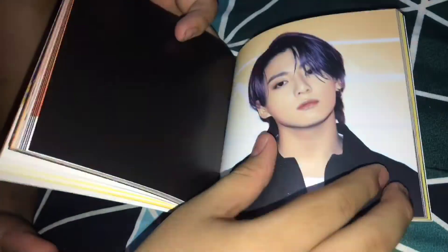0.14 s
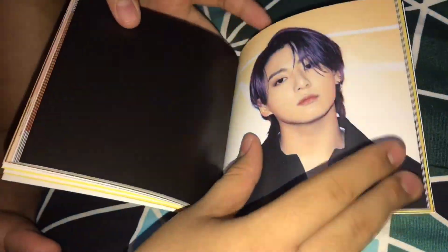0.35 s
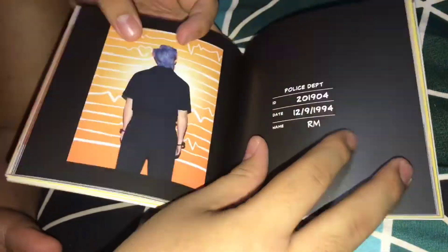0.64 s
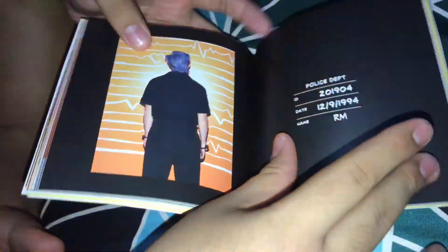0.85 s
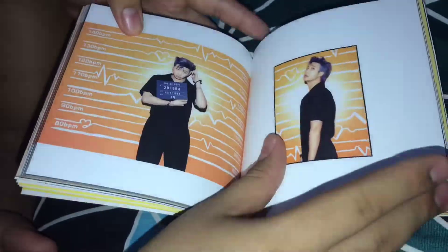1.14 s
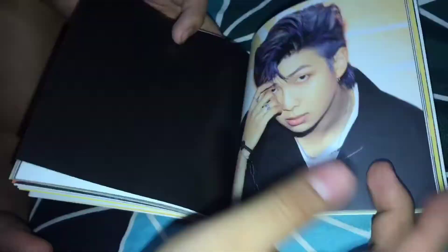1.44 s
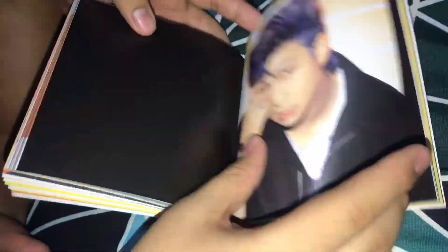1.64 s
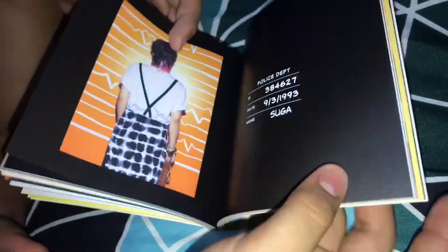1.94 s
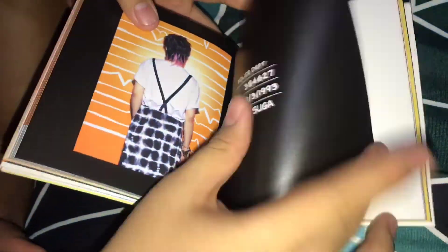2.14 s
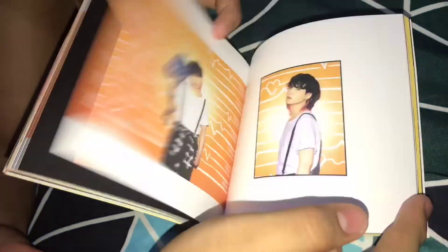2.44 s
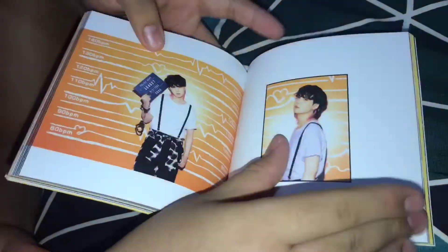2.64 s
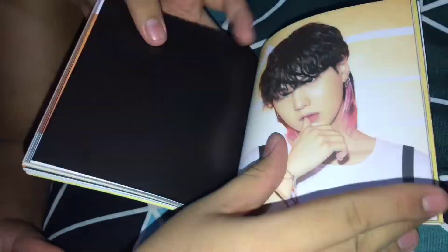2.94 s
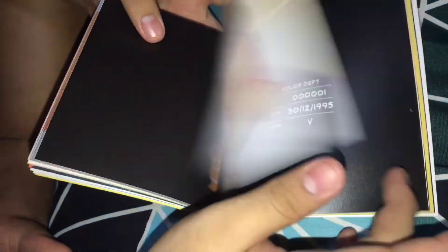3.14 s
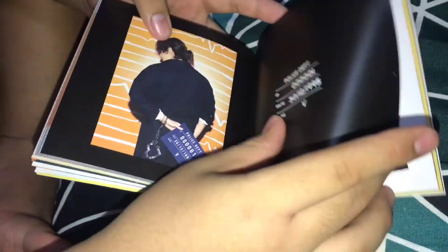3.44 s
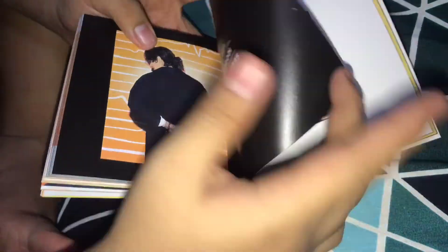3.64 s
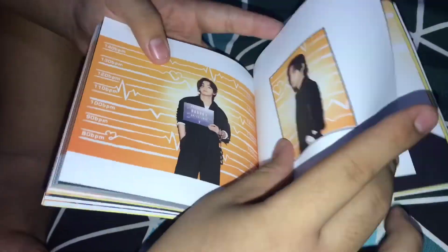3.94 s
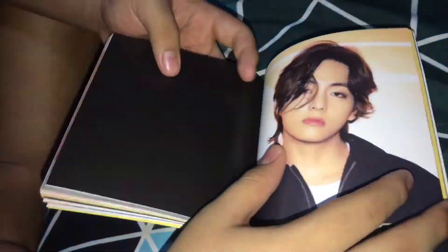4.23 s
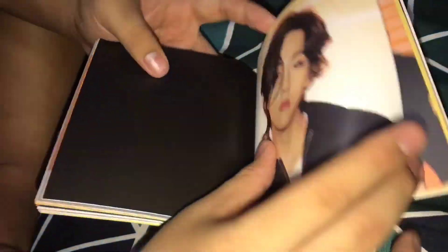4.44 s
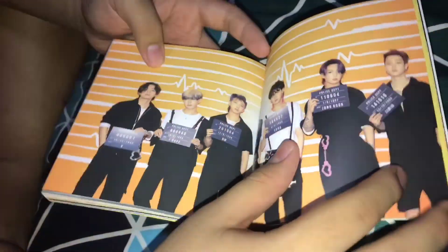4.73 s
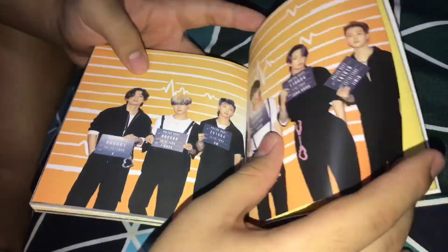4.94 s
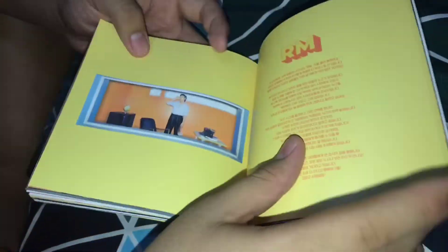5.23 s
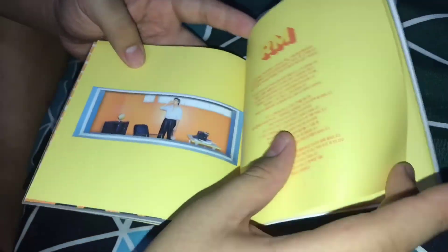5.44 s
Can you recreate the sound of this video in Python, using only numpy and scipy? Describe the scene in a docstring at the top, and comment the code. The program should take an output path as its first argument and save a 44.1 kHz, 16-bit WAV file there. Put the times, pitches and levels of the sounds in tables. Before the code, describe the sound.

Close to a phone in a small quiet room, a hand turns stiff glossy pages about twice a second. Each turn starts with a quick peeling scrape, followed by short swishes and a faint rustle as the sheet settles. Tiny dry snaps and soft pats on the stack come in between, while a fan hums low and hisses faintly throughout.

```python
"""A hand leafs through a book of stiff glossy pages, close to a phone in a quiet room, about two pages a second.
In each turn a finger peels a sheet off the stack, and it slides in short swishes and rustles as it settles.
These rubs are tiny random slips that ring the paper; now and then a fingertip drags on the gloss.
Edges snapping free and pats on the stack are short damped swings, each with a tiny crack of noise.
Behind the pages a fan or air conditioner, made of shaped noise, hums low and hisses faintly."""
import sys
import numpy as np
from scipy import signal
from scipy.fft import rfft, irfft
from scipy.io import wavfile
from scipy.ndimage import uniform_filter1d

SR = 44100
rng = np.random.default_rng(int(sys.argv[2]) if len(sys.argv) > 2 else 0)


def put_to_file(sound):
    """Save the sound as 16-bit audio at rate SR, in the file named by the first command-line argument."""
    columns = np.atleast_2d(sound).T  # one column per channel
    safe = np.clip(columns, -1, 1)
    whole_steps = np.round(safe * 32767)
    wavfile.write(sys.argv[1], SR, whole_steps.astype(np.int16))


N = 245637
TIME = np.arange(N) / SR
FREQS = np.maximum(np.arange(N // 2 + 1) * SR / N, 1)  # kept above zero so that its log exists

# What rubbed paper rings with: four body tones of the stiff page block, then the hiss of the edge.
# Columns: pitch_hz, width_hz
PAPER_TONES = [(1280, 420), (2060, 484), (2800, 525), (3600, 755), (5750, 2000)]
# A finger peels a sheet off the stack and starts a turn; a rustle follows.
# Columns: height_s (moment of full speed), rise_s, fall_s, level_db, edge_hiss_db (above level), rustle_level_db
PEELS = [(0.389, .008, 0.016, -46.5, -4, -61), (0.877, 0.019, 0.033, -47.5, -4, -63),
         (1.289, .011, 0.02, -47.5, -0.5, -65), (1.611, 0.0064, 0.0074, -44, -8.5, -61.5),
         (2.115, 0.011, 0.015, -50, -1, -67), (2.686, .009, .012, -47, 0.5, -64),
         (3.073, 0.0079, .011, -46, -2.5, -72), (3.401, .005, 0.019, -47.5, -1, -72.5),
         (3.955, .01, 0.027, -48, -4, -66), (4.331, .0064, 0.019, -51.5, -4, -61),
         (4.879, 0.012, 0.016, -51, -7, -65), (5.374, 0.012, 0.0071, -49.5, -3, -62.5),
         (5.448, 0.011, 0.038, -53.5, -4, -73)]
# How hard a peel drives each body tone. Column: drive_db (added to its level)
PEEL_DRIVE = [-9, -1, -1, -2.5]
# The sheet slides over its neighbour, brighter the more it is bent.
# Columns: height_s, length_s, level_db, tilt_db_per_octave, edge_hiss_db (above level)
SLIDES = [(0.028, 0.035, -60, 8, -1), (0.052, 0.025, -49.5, 7, -11), (0.109, 0.027, -55.5, 9.5, -0.5),
          (0.432, .016, -50.5, 2, -5.5), (0.473, 0.023, -57.5, 0, -1), (0.517, 0.034, -55, 2, -7),
          (0.626, 0.012, -62.5, -2.5, 13.5), (0.966, 0.021, -46, -0.5, -6), (1.001, 0.019, -51, 9.5, -4),
          (1.415, 0.028, -52.5, 3, 1), (1.471, 0.018, -55.5, 12, -3), (1.647, 0.023, -55, 3, -6),
          (1.73, 0.022, -53.5, 4, -1), (1.84, 0.023, -51, 10, -2.5), (1.938, 0.017, -53.5, 13, -3),
          (2.147, 0.021, -49, 1, -1), (2.252, 0.014, -49, 5, 0), (2.43, 0.049, -58, 4, -1),
          (2.489, 0.03, -57.5, 12, -4), (2.724, 0.063, -52.5, 1.5, -3.5), (2.823, 0.028, -52.5, -1.5, -5),
          (2.864, 0.022, -49.5, 19, -8), (3.107, 0.033, -54.5, 1, -5.5), (3.169, 0.024, -48, -1, -18),
          (3.21, 0.019, -53.5, 6, -13), (3.624, 0.026, -48.5, -0.5, -9), (3.675, 0.011, -47, 8, -8),
          (3.693, 0.016, -47, -3, -11), (3.719, 0.038, -59.5, 11, 4), (3.916, 0.024, -53, 4, 1),
          (4.035, 0.023, -58.5, 6, 1), (4.153, 0.039, -55.5, 10, -3.5), (4.493, 0.03, -55.5, 0, 2.5),
          (4.522, 0.014, -54, 2.5, -3), (4.611, 0.051, -58, 7, -2.5), (5.031, 0.024, -48.5, 3.5, -6.5),
          (5.109, .032, -49.5, 5, -3.5), (5.154, 0.025, -51, 11.5, -4.5), (5.492, 0.025, -53.5, 1, 0),
          (5.536, 0.0099, -51.5, 13, -13), (5.556, .026, -48.5, -7, -22)]
# How hard an untilted slide drives each body tone. Column: drive_db (added to its level)
SLIDE_DRIVE = [-1.8, -2, 0.6, -0.46]
SLIDE_RISE_SHARE, TILT_PIVOT_HZ = 0.52, 2820  # part of the length spent speeding up; pitch the tilt leaves alone
# A fingertip drags on the gloss. Columns: height_s, fall_s, level_db
DRAGS = [(0.966, 0.0093, -44), (2.128, 0.026, -52), (2.705, .02, -52), (3.172, 0.013, -48.5),
         (3.5, .014, -52.5), (4.971, 0.037, -47)]
# How hard a drag drives each paper tone, mostly one of them. Column: drive_db (added to its level)
DRAG_DRIVE = [-17, -0.5, -14, -16, -11.5]
DRAG_RISE_S = 0.014
# How hard the loose sheet's rustle drives each paper tone. Column: drive_db (added to its level)
RUSTLE_DRIVE = [-9, -3.5, -2, 1, -2]
RUSTLE_DELAY_S, RUSTLE_RISE_S, RUSTLE_FALL_S = 0.13, 0.08, 0.085
RUSTLE_FLUTTER_DB, RUSTLE_FLUTTER_PER_S = 5, 80
STUTTER_DB, STUTTER_PER_S = 1.9, 160  # a rub catches and lets go
# A page edge snaps free. Columns: start_s, peak_db, pitch_hz, ring_s (time to fall by 60 dB)
SNAPS = [(0.0496, -34, 2930, 0.0046), (0.3835, -36, 2800, .005), (1.604, -35, 3400, 0.0045),
         (1.94, -37, 3200, .0055), (2.2449, -30, 1440, 0.0051), (3.07, -31, 2720, .005),
         (3.17, -34, 1920, .0036), (3.6136, -29, 2940, 0.0049), (3.6224, -29, 2780, 0.0073),
         (3.6337, -27.5, 2500, 0.0048), (4.0488, -23.5, 3030, 0.0043), (4.6118, -33, 3340, 0.0069),
         (5.1124, -29, 3170, .0052)]
# A page or finger lands on the stack, which knocks and thuds.
# Columns: start_s, knock_peak_db, knock_pitch_hz, thud_peak_db
PATS = [(2.822, -57, 1250, -41), (3.165, -38.5, 1945, -42), (3.62, -48, 870, -53),
        (3.694, -36, 1267, -38.5), (4.049, -44.5, 480, -48), (5.034, -55, 1250, -44),
        (5.547, -40.5, 1205, -44), (5.554, -44.5, 1030, -38)]
KNOCK_RING_S, THUD_HZ, THUD_RING_S = 0.025, 350, 0.012  # ring: time to fall by 60 dB
# Tone of the room's moving air, as a shape only. Columns: pitch_hz, density_db (per Hz)
AIR_TONE = [(15, -1.5), (130, 0.5), (220, -0.5), (310, 1), (370, -6.5), (480, -9.5), (740, -14),
            (1250, -12), (1650, -16.5), (2900, -16), (3600, -20.5), (4700, -26), (6400, -26), (7400, -34.5)]
AIR_DB = -47.5
# Resonances of the fan housing. Columns: pitch_hz, width_hz, lift_db
FAN_HOUSING = [(553.6, 60, 6), (647, 58, 6.5), (865, 100, 5), (2234, 36, 6.5), (2577, 30, 9.5),
               (2657, 55, 9.5), (2732, 32, 6.5), (2830, 55, 2.5), (2840, 60, 5), (3090, 100, 8),
               (3205, 81, 5.5), (3824, 44, 9.5), (3870, 59, 10), (4026, 58, 4.5), (4370, 39, 8),
               (4800, 190, 2), (5370, 110, 7.5), (6170, 36, 8.5), (6300, 21, -3)]
# Tone of the low hum, as a shape only. Columns: pitch_hz, density_db (per Hz)
HUM_TONE = [(15, -28.5), (30, -14.5), (45, -8.5), (60, -2), (71, 2.5), (81, -6.5), (92, -6.5), (112, -29.5),
            (160, -62.5)]
# Level of the low hum, following the chance beats of its narrow noise. Columns: time_s, level_db
HUM_LEVEL = [(0.0, -36.5), (0.81, -37.5), (0.93, -43), (1.05, -39), (1.71, -39), (1.8, -42), (2.07, -35.5),
             (2.43, -41), (2.61, -35), (2.82, -41.5), (3.42, -35), (3.63, -40.5), (4.29, -37), (4.47, -43),
             (4.65, -36), (4.83, -39.5), (5.4, -36.5), (5.55, -37.5)]
# Tone of the phone. Columns: pitch_hz, gain_db
PHONE_TONE = [(3900, -1.0), (4400, 1.5), (4900, -0.5), (5500, -1.0), (6350, 0.5), (6900, -1.0), (7400, -10)]
PHONE_TOP_HZ = 7520


def rubbing():
    """Tiny slips ring the paper; the strokes and the rustle set how hard each tone is driven."""
    slips = friction(slips_per_s=1600, scatter_db=1, smooth=0.96)
    slips = slips * undb(STUTTER_DB * flutter(STUTTER_PER_S))
    rings = np.array([unit(colour(slips, resonance(hz, width))) for hz, width in PAPER_TONES])

    moves = peels() + slides() + drags()
    speeds = np.array([stroke(at, rise, fall) for at, rise, fall, _ in moves] + [rustle()])
    drives = undb([drive_db for *_, drive_db in moves] + [RUSTLE_DRIVE])
    # movements that overlap add up as energy
    loudness = np.sqrt(drives.T ** 2 @ speeds ** 2)
    return np.sum(loudness * rings, axis=0)


def peels():
    """A peeling finger: each rub as (height s, rise s, fall s, level in dB at each paper tone)."""
    return [(at, rise, fall, db + np.append(PEEL_DRIVE, hiss)) for at, rise, fall, db, hiss, _ in PEELS]


def slides():
    """Sliding sheets, listed like the peels; the tilt favours high or low body tones."""
    octaves = np.log2(np.array(PAPER_TONES)[:-1, 0] / TILT_PIVOT_HZ)
    moves = []
    for at, length, db, tilt, hiss in SLIDES:
        rise = SLIDE_RISE_SHARE * length
        body = SLIDE_DRIVE + tilt * octaves
        moves.append((at, rise, length - rise, db + np.append(body, hiss)))
    return moves


def drags():
    """A fingertip dragging on the gloss, listed like the peels."""
    return [(at, DRAG_RISE_S, fall, db + np.array(DRAG_DRIVE)) for at, fall, db in DRAGS]


def rustle():
    """Level of the loose sheet, fluttering at random while it swings over after each peel."""
    swinging = sum(undb(db) * stroke(at + RUSTLE_DELAY_S, RUSTLE_RISE_S, RUSTLE_FALL_S)
                   for at, *_, db in PEELS)
    return swinging * undb(RUSTLE_FLUTTER_DB * flutter(RUSTLE_FLUTTER_PER_S))


def friction(slips_per_s, scatter_db, smooth):
    """Dense tiny slips of uneven size over an even rub."""
    slips = (rng.random(N) < slips_per_s / SR) * rng.choice([-1, 1], N)
    sizes = undb(scatter_db * np.minimum(rng.standard_normal(N), 2))
    rub = unit(slips * sizes) + smooth * rng.standard_normal(N)
    # the hand feeds in energy evenly, so a big slip leaves less for its neighbours
    energy = uniform_filter1d(rub ** 2, size=500)
    return rub / np.sqrt(energy)


def stroke(at, rise, fall, sharpness=1.4):
    """Speed of a movement that swells to 1 at its height and dies away."""
    since = TIME - at
    distance = np.abs(since / np.where(since < 0, rise, fall))
    return np.exp(-np.minimum(distance, 20) ** sharpness)


def flutter(per_s):
    """Random values joined by straight lines, spread near 1."""
    return np.interp(TIME * per_s, np.arange(N), rng.standard_normal(N))


def snaps():
    """A page edge springs free: a very short swing with a sharp crack."""
    return blows(SNAPS, push_s=0.000053, crack_db=-8.5, crack_s=0.00048)


def pats():
    """A landing page or finger makes the stack knock at one pitch and thud at a low one."""
    knocks = [(at, db, hz, KNOCK_RING_S) for at, db, hz, _ in PATS]
    thuds = [(at, db, THUD_HZ, THUD_RING_S) for at, _, _, db in PATS]
    return blows(knocks + thuds, push_s=0.0012, crack_db=-30, crack_s=0.0055)


def blows(table, push_s, crack_db, crack_s):
    """Each blow swings the paper for a short time, with a dry crack of noise on top."""
    t = np.arange(SR // 20) / SR
    out = np.zeros(N + len(t))
    for at, db, hz, ring_s in table:
        crack = rng.standard_normal(len(t)) * np.exp(-t / crack_s)
        blow = swing(t, hz, ring_s, push_s) + undb(crack_db) * crack
        start = int(at * SR)
        out[start:start + len(t)] += undb(db) * blow
    return out[:N]


def swing(t, hz, ring_s, push_s):
    """A damped swing of peak 1, set going by a push of finite length."""
    fade = np.exp(-np.log(1000) * t / ring_s)
    wave = np.sin(2 * np.pi * hz * t) * fade * (1 - np.exp(-t / push_s))
    return wave / np.abs(wave).max()


def room(x, wet_db=-17, fade_s=0.51):
    """A small furnished room adds a faint short tail of noise that fades by 60 dB in fade_s."""
    t = np.arange(SR // 2) / SR
    fade = np.exp(-np.log(1000) * t / fade_s)
    tail = rng.standard_normal(len(t)) * fade * (t > 0.004)
    tail = tail / np.linalg.norm(tail)
    return x + undb(wet_db) * signal.fftconvolve(x, tail)[:N]


def fan_air():
    """Steady moving air: noise lifted at the resonances of the fan housing."""
    lift_db = sum(db * np.exp(-2 * ((FREQS - hz) / width) ** 2) for hz, width, db in FAN_HOUSING)
    air = colour(rng.standard_normal(N), spectrum(AIR_TONE) * undb(lift_db))
    return undb(AIR_DB) * unit(air)


def hum(steadiness=0.78):
    """A low rumble, its own beats partly evened out, with a level curve that follows the random beating of narrow noise."""
    rumble = unit(colour(rng.standard_normal(N), spectrum(HUM_TONE)))
    power = np.abs(signal.hilbert(rumble)) ** 2
    swell = np.sqrt(uniform_filter1d(power, size=4400))
    level_db = np.interp(TIME, *np.transpose(HUM_LEVEL))
    return unit(rumble / swell ** steadiness) * undb(level_db)


def undb(db):
    """Decibels to gain."""
    return 10 ** (np.asarray(db) / 20)


def unit(x):
    """Scale to an average (rms) level of 1."""
    return x / np.sqrt(np.mean(x ** 2))


def colour(x, gain):
    """Filter by a gain for each of FREQS."""
    return irfft(rfft(x) * gain, N)


def spectrum(points):
    """Gain along (Hz, dB) points, joined by straight lines over log frequency."""
    hz, db = np.transpose(points)
    return undb(np.interp(np.log(FREQS), np.log(hz), db))


def resonance(hz, width):
    """Gain of a bell-shaped resonance, 1 at its centre and half power at the edges of its width."""
    return 0.5 ** (2 * ((FREQS - hz) / width) ** 2)


def scene():
    """The pages close by in the room, the fan behind them."""
    pages = rubbing() + snaps() + pats()
    return (room(pages) + fan_air() + hum())[None]


def record(dry):
    """The phone lifts the tone near 4.4 kHz, softens the upper treble and cuts the top steeply."""
    soft = colour(dry[0], spectrum(PHONE_TONE))
    steep = signal.ellip(12, 0.2, 80, PHONE_TOP_HZ, fs=SR, output="sos")
    return signal.sosfilt(steep, soft)[None]


dry = scene()
out = record(dry)
put_to_file(out)
```